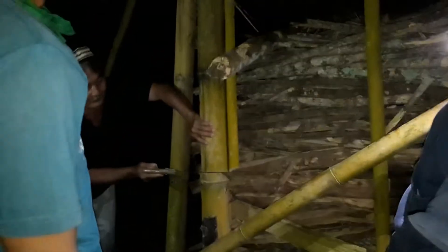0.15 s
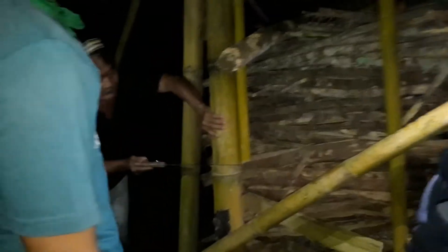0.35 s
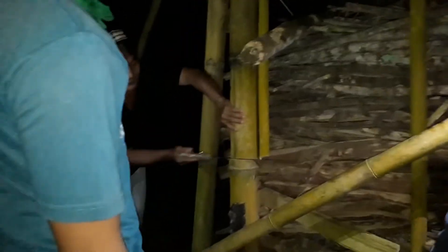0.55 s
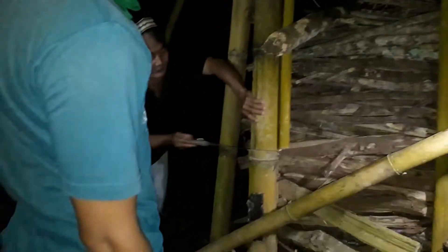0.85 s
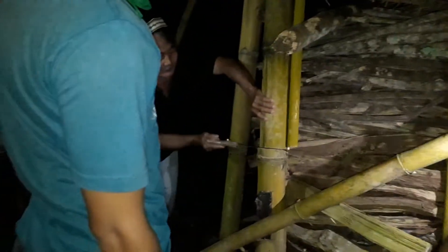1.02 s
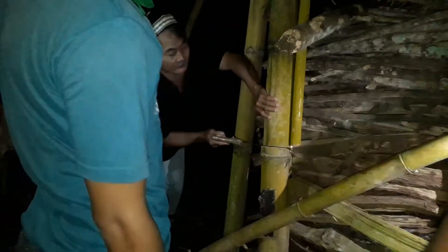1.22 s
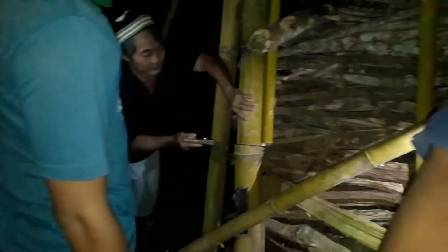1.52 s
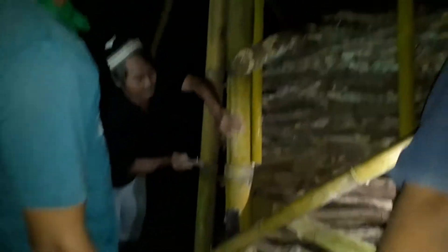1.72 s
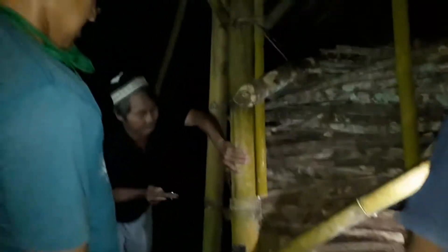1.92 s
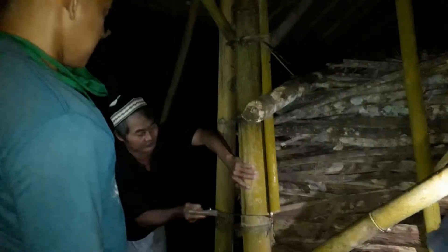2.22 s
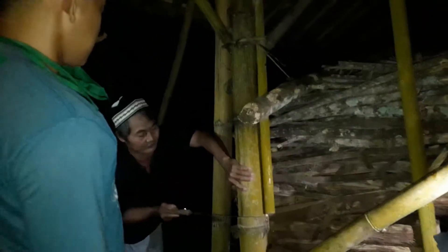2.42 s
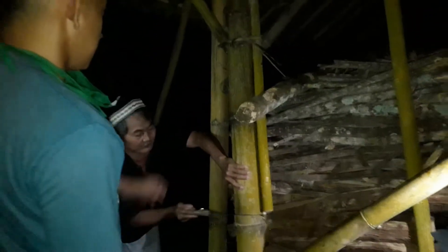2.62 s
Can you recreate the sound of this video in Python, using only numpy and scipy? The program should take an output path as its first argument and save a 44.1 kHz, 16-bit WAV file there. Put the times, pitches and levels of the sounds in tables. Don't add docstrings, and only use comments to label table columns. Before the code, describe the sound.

Close, dry sawing of hollow bamboo outdoors: fast raspy strokes with fibre cracks and brief blade squeals, a short lull, then rougher strokes, over faint cricket trills and low night hum, captured by a phone.

```python
import sys
import numpy as np
from scipy import signal
from scipy.fft import rfft, irfft, next_fast_len
from scipy.io import wavfile
from scipy.ndimage import uniform_filter1d, map_coordinates

SR = 44100
rng = np.random.default_rng(int(sys.argv[2]) if len(sys.argv) > 2 else 0)


def inscribe(sig):
    pcm = np.round(np.clip(np.atleast_2d(sig).T, -1, 1) * 32767)
    wavfile.write(sys.argv[1], SR, pcm.astype(np.int16))


def to_linear_factor(level_db):
    exponent = np.asarray(level_db, float) / 20
    return 10 ** exponent


N = 121275

# (start t/s, fastest t/s, end t/s, level/dB, blade ring level/dB)
STROKES = [(0.0, 0.164, 0.21, -39, -3.5), (0.182, 0.314, 0.42, -35, 2), (0.398, 0.518, 0.64, -31.5, 0.5),
           (0.606, 0.71, 0.84, -33.5, 4), (0.82, 0.933, 1.04, -35, 5.5), (1.293, 1.415, 1.44, -46, -5.5),
           (1.459, 1.504, 1.588, -41, -16), (1.805, 1.869, 1.96, -35, 0), (1.9, 2.005, 2.114, -49, -5),
           (2.117, 2.198, 2.26, -32, 4), (2.25, 2.341, 2.457, -34.5, 9.5), (2.435, 2.584, 2.6565, -31, 2),
           (2.65, 2.653, 2.71, -42.5, -27)]
# (hiss level/dB, frame shake level/dB, hiss lag t/s)
TEARING = [(-1.5, -2.5, -0.0036), (-1.5, 2, 0.0015), (-2, 2, 0.015), (1, 2.5, 0.031), (2.5, 1, -0.0072),
           (-6.5, 7.5, -0.014), (-5.5, 3.5, -0.00085), (4, -5.5, -0.012), (-4.5, -10, 0.026),
           (-2.5, -5, -0.0093), (2.5, 2.5, -.01), (-3.5, -2, -0.0024), (-5, 6.5, -0.0042)]
# (f/Hz, width f/Hz, level/dB)
TUBE_MODES = [
    [(777, 160, 2), (945, 185, 1), (1580, 158, -8), (345, 135, -11)],
    [(744, 136, 2.5), (1743, 83, 0.5), (330, 36, -12.5)],
]
# (f/Hz, width f/Hz, level/dB)
BLADE_MODES = [
    [(1860, 203, -5.5), (2103, 33, 2), (2336, 144, 0.5), (2680, 77, -1), (2774, 36, 5), (3366, 130, 0.5), (3950, 470, -7.5)],
    [(2134, 160, -3), (2363, 73, -4.5), (2567, 70, -3.5), (2834, 53, -1.5), (3170, 88, -9), (3400, 121, -28), (3690, 92, -4.5)],
]
# (f/Hz, level/dB per Hz)
GRIT_COLOUR = [(800, -33), (1300, -11.5), (2400, 2), (4200, -14.5), (7000, -23)]
# (f/Hz, level/dB per Hz)
HISS_COLOUR = [(2350, -16), (4000, -11), (5160, 0.5), (5500, -2), (9010, -5.5), (10900, -14.5),
               (15000, -10.5), (16000, -15)]
# (f/Hz, level/dB per Hz)
THUMP_COLOUR = [(20, -33), (60, -26), (120, -12), (180, -5), (330, -8.5), (470, 1.5), (600, -12.5),
                (900, -27)]
# (t/s, peak level/dB, tube knock level/dB, t60 t/s, attack t/s)
CATCHES = [(0.213, -22.5, -9, 0.058, 0.00024), (.2635, -19, -28, 0.051, 0.0006),
           (.418, -27.5, -5, 0.056, 0.00037), (.6242, -23.5, -20, 0.086, 0.00092),
           (.6565, -21.5, -5, 0.088, 0.00046), (.75, -14, -6, 0.15, 0.0057),
           (.9645, -11, -8.5, 0.041, 0.0007), (1.0367, -23, -3, 0.069, 0.00053),
           (1.0808, -28.5, -7, 0.045, 0.00046), (1.1244, -28, -1.5, 0.079, 0.0014),
           (1.4272, -29, 1, 0.081, 0.00039), (1.4905, -27, 0, 0.077, 0.0012),
           (1.737, -33, 0.5, 0.1, 0.0023), (1.804, -22, -20, 0.22, 0.0067),
           (1.912, -25, 0.5, 0.067, 0.0034), (1.958, -34, -23, 0.081, 0.0023),
           (2.152, -30, 1, 0.11, 0.0016), (2.1, -25.5, -21, 0.39, 0.025),
           (2.264, -21.5, -14, 0.085, 0.00032), (2.3072, -10.5, -9.5, 0.045, 0.00045),
           (2.487, -23.5, 5, 0.064, 0.00049), (2.6583, -23.5, -14, 0.04, 0.00042),
           (2.6684, -24.5, -5.5, 0.064, 0.00083)]
CATCH_SHINE = [-6, 1.5, -14, 7, -1.5, -14, -8, 3.5, -7, -19, 6.5, -15, 0, 0, 3, -6, 3, 0, -1, 2, -2, -12,
               -4]
# (t/s, peak level/dB, brightness level/dB)
SNAGS = [(.121, -35, 0), (.128, -22, -9), (.2424, -21, 3), (.2923, -29, 4), (0.382, -29, 5), (.436, -36, 5),
         (.45, -29, -2), (.4724, -22.5, 2), (0.6807, -24, -10), (.854, -33, -11), (0.8738, -39, 4),
         (.8939, -19, -9), (.927, -18.5, 2.5), (1.383, -36, -3), (1.528, -35, -17), (1.8313, -23.5, 0),
         (1.843, -33, -8), (1.865, -15.5, -14), (1.881, -10.5, -24), (1.9713, -39.5, 10),
         (2.0218, -30.5, -9), (2.1185, -28.5, -5), (2.205, -20.5, 1), (2.5232, -22, 1), (2.5481, -14, -1),
         (2.5975, -17, -2)]
# (f/Hz, level/dB)
CRACK_COLOUR = [(300, -1), (1500, 0), (3500, 1.5), (8000, -8.5), (12000, -6), (16500, -4.5)]
# (t/s, peak level/dB)
BITES = [(.133, -29), (.327, -23), (.713, -16), (.718, -18), (1.882, -17), (2.165, -17), (2.170, -19),
         (2.176, -19), (2.21, -22), (2.306, -15), (2.321, -18), (2.335, -16), (2.342, -15), (2.356, -14),
         (2.371, -14), (2.377, -20), (2.546, -20), (2.553, -19)]
# (t/s, half length t/s, level/dB, pitch f/Hz)
SINGING = [(.275, 0.014, -32, 2600), (.333, 0.0069, -27, 2650), (0.526, 0.028, -37, 2340),
           (.545, .012, -35, 830), (.66, 0.0045, -31, 825), (0.693, .008, -34, 1920),
           (.71, 0.017, -26, 2620), (.97, 0.012, -33.5, 1580), (1.41, 0.021, -44.5, 838),
           (1.496, 0.0018, -36, 5710), (1.132, 0.0051, -38, 858), (1.828, 0.0078, -36, 774),
           (1.877, 0.01, -33, 3400), (2.164, 0.011, -35, 3760), (2.183, 0.0072, -29, 2653),
           (2.234, 0.0092, -34.5, 773), (2.292, 0.0028, -26.5, 730), (2.321, 0.026, -33, 3737),
           (2.355, .008, -26.5, 1660), (2.502, 0.016, -32, 763), (2.548, 0.011, -28, 2598),
           (2.579, 0.013, -25.5, 753)]
# (t/s, level/dB, pitch f/Hz, t60 t/s)
JOLTS = [(0.171, -47, 397, 0.16), (0.335, -28, 330, 0.12), (0.619, -43.5, 180, .1),
         (0.967, -41, 183.3, 0.33), (1.031, -42.5, 190, 0.19), (1.125, -50, 133.4, 0.24),
         (1.745, -30.5, 348, 0.027), (2.349, -28.5, 320, .15), (2.358, -42, 196, 0.1),
         (2.551, -39.5, 140, 0.37)]
# (f/Hz, width f/Hz, click rate f/Hz, level/dB)
CRICKETS = [
    (3520, 310, 110, -61.5),
    (3930, 340, 160, -65.5),
    (5600, 590, 150, -74),
    (7000, 260, 72, -72.5),
    (4600, 700, 110, -69.5),
]
# (f/Hz, level/dB per Hz)
NIGHT_COLOUR = [(15, -33), (40, -25), (100, -7.5), (170, -4), (650, -12.5), (2500, -19), (5500, -22),
                (6100, -28), (16000, -31.5)]
# (t/s, above f/Hz)
DUCKED_HIGHS = [(.623, 9000), (1.035, 11000), (1.734, 7000), (1.803, 4300), (2.262, 6500), (2.658, 7000)]
OPEN_ATTACKS = [.628, 1.04, 1.431]


def unit(x):
    return x / np.sqrt(np.mean(x ** 2) + 1e-20)


def wobble(rate):
    knots = rng.standard_normal(int(N * rate / SR) + 4)
    return map_coordinates(knots, [np.arange(N) * rate / SR])


def filtered(x, response):
    m = next_fast_len(N + SR // 2)
    return irfft(rfft(x, m) * response(np.fft.rfftfreq(m, 1 / SR)), m)[..., :N]


def colour(points):
    f, db = np.transpose(points)
    return lambda hz: to_linear_factor(np.interp(np.log(hz + 1), np.log(f + 1), db))


def body(peaks):
    def response(f):
        total = 0
        for k, (centre, width, db) in enumerate(peaks):
            damping = 1j * f * width
            total = total + (-1) ** k * to_linear_factor(db) * damping / (centre ** 2 - f ** 2 + damping)
        return total
    return response


def through(x, pair):
    deep = np.arange(N) > 1.97 * SR
    shallow_ring = filtered(x * ~deep, body(pair[0]))
    return shallow_ring + filtered(x * deep, body(pair[1]))


def patchy(x):
    z = signal.stft(x, nperseg=256)[2]
    field = uniform_filter1d(rng.standard_normal(z.shape), size=5, axis=0)
    field = uniform_filter1d(field, size=3, axis=1)
    return unit(signal.istft(z * to_linear_factor(4.5 * unit(field)), nperseg=256)[1][:N])


def effort(power, extra_db=0, lag=0):
    rise, fall = 1.39, 2.13
    t, gain = np.arange(N) / SR, np.zeros(N)
    each = np.zeros(len(STROKES))
    for (start, top, end, db, _), more, late in zip(STROKES, extra_db + each, lag + each):
        top = np.clip(top + late, start + 0.0033, end - .003)
        speed = np.sin(np.pi / 2 * np.interp(t, [start, top, end], [0, 1, 0]))
        gain += to_linear_factor(db + more) * speed ** (power * np.where(t < top, rise, fall))
    return gain


def teeth():
    teeth_per_s, scatter_db, surge_db, surges_per_s = 1100, 1, 0.92, 130
    hit = rng.random(N) < teeth_per_s / SR
    size = to_linear_factor(scatter_db * np.clip(rng.standard_normal(N), -3, 1))
    sign = np.sign(rng.standard_normal(N))
    shower = unit(unit(hit * size * sign) + 0.96 * rng.standard_normal(N))
    return shower * to_linear_factor(surge_db * wobble(surges_per_s))


def hollow_tube(strikes):
    notch = body([(590, 150, 0)])
    ring = through(strikes * effort(1), TUBE_MODES)
    return filtered(ring, lambda f: 1 - 0.32 * notch(f)) / np.std(through(strikes, TUBE_MODES))


def steel_blade(strikes):
    ring_db = np.transpose(STROKES)[-1]
    ring = through(teeth() * effort(1.55, ring_db), BLADE_MODES)
    return ring / np.std(through(strikes, BLADE_MODES))


def tearing(strikes):
    hiss_db, _, lag = np.transpose(TEARING)
    grit_gain = to_linear_factor(-2 + 1.8 * wobble(70)) * effort(1.55, hiss_db, lag / 2)
    grit = grit_gain * patchy(filtered(strikes, colour(GRIT_COLOUR)))
    hiss_gain = to_linear_factor(-5 + 0.55 * wobble(45.35)) * effort(1.6, hiss_db, lag)
    hiss = hiss_gain * patchy(filtered(strikes, colour(HISS_COLOUR)))
    return grit + hiss


def frame_shake():
    shake_db = np.transpose(TEARING)[1]
    return to_linear_factor(-10.5) * effort(0.93, shake_db, 0.021) * unit(filtered(teeth(), colour(THUMP_COLOUR)))


def saw():
    strikes = teeth()
    return hollow_tube(strikes) + steel_blade(strikes) + tearing(strikes) + frame_shake()


def catches():
    snag_knock_db, snag_t60_s, snag_attack_s = -23.5, 0.048, 0.0009
    tick_db, tick_t60_s, shine_hz = -2.5, 0.022, 9200
    tick, tear, knock = np.zeros((3, N))
    t = np.arange(SR // 16) / SR
    events = CATCHES + [(s, db, snag_knock_db, snag_t60_s, snag_attack_s) for s, db, _ in SNAGS]
    brightness = CATCH_SHINE + [snag[2] for snag in SNAGS]

    shine = np.ones(N)
    for s, db in sorted(zip([event[0] for event in events], brightness)):
        shine[round(s * SR) - 40:] = to_linear_factor(db)

    for s, db, knock_db, t60, attack in events:
        tear_noise, knock_noise, tick_noise = rng.standard_normal((3, len(t)))
        here = slice(round(s * SR), round(s * SR) + len(t))
        fade = to_linear_factor(db - 60 * t / t60) * (1 - np.exp(-t / attack))
        sharpness = np.exp(-attack / 0.00073)
        tick[here] += to_linear_factor(db + tick_db - 60 * t / tick_t60_s) * tick_noise * sharpness
        tear[here] += fade * tear_noise
        knock[here] += to_linear_factor(knock_db + 8.0) * fade * knock_noise

    bright_tick = filtered(tick, lambda hz: 1j * hz / (5000 + 1j * hz))
    burst = bright_tick + to_linear_factor(-4.0) * filtered(tear, colour(CRACK_COLOUR))
    high = filtered(burst, lambda hz: 1 / (1 + (shine_hz / (hz + 1)) ** 6))
    return burst + (shine - 1) * high + through(knock, TUBE_MODES)


def squeals():
    out, t = np.zeros(N), np.arange(N) / SR
    for s, db in BITES:
        low_phase, high_phase, detune = 2 * np.pi * rng.random(3)
        hz = 2615 * (1 + .02 * np.sin(detune))
        tone = np.sin(2 * np.pi * hz * t + low_phase)
        tone += 0.19 * np.sin(2 * np.pi * 1.4 * hz * t + high_phase)
        out += to_linear_factor(db) * np.exp(-.5 * ((t - s) / 0.0012) ** 2) * tone
    return out


def singing():
    out, u = np.zeros(N), np.arange(-SR // 16, SR // 16) / SR
    for s, half, db, hz in SINGING:
        roughness = .065 * np.cumsum(rng.standard_normal(len(u)))
        tone = np.sin(2 * np.pi * hz * u + roughness)
        out[round(s * SR) - SR // 16:][:len(u)] += to_linear_factor(db) * np.exp(-.5 * (u / half) ** 2) * tone
    return out * to_linear_factor(4 * wobble(150))


def frame_jolts():
    out, t = np.zeros(N), np.arange(SR // 6) / SR
    onset = 1 - np.exp(-(t / 0.0052) ** 2)
    for s, db, hz, t60 in JOLTS:
        phase = 2 * np.pi * hz * t + 0.034 * np.cumsum(rng.standard_normal(len(t)))
        out[round(s * SR):][:len(t)] += to_linear_factor(db - 60 * t / t60) * onset * np.sin(phase)
    return out


def yard(x):
    t60_s, level_db, low_hz = 0.29, -12.5, 606
    t, out = np.arange(SR // 3) / SR, np.zeros(N)
    part = np.arange(N) // (SR // 5) % 4
    for k in range(4):
        tail = rng.standard_normal(len(t)) * to_linear_factor(-60 * t / t60_s)
        out += signal.fftconvolve(x * (part == k), tail / np.linalg.norm(tail))[:N]
    return to_linear_factor(level_db) * filtered(out, lambda hz: hz / (hz + low_hz))


def crickets():
    out = np.zeros(N)
    for hz, width, rate, db in CRICKETS:
        cycles = np.cumsum(rate * (1 + .01 * wobble(10))) / SR
        clicks = np.diff(np.floor(cycles), prepend=0)
        drive = unit(clicks * to_linear_factor(0.62 * wobble(53))) + 1.4 * rng.standard_normal(N)
        wing = body([(hz, width, 0)])
        trill = unit(filtered(drive, lambda f: wing(f) ** 2))
        out += to_linear_factor(db + 0.62 * wobble(8.4)) * trill
    return out


def night_hum():
    hum = unit(filtered(rng.standard_normal(N), colour(NIGHT_COLOUR)))
    return to_linear_factor(-58 + 0.23 * wobble(32)) * hum


def scene():
    low_cut_hz = 90
    work = saw() + catches() + squeals() + singing()
    work = filtered(work, lambda hz: (1j * hz / (low_cut_hz + 1j * hz)) ** 2)
    return (work + yard(work) + frame_jolts() + crickets() + night_hum())[None]


def holes(x):
    above_hz, threshold, depth_db = 10370, 0.66, -28
    hz, s, z = signal.stft(x, SR, nperseg=512)
    field = uniform_filter1d(rng.standard_normal(z.shape[1:]), size=7, axis=0)
    field = unit(uniform_filter1d(field, size=2, axis=1))
    field = field + np.interp(s, [1.6, 1.9], [-.4, .3])
    thin = (hz[:, None] > above_hz) / (1 + np.exp(-4 * (field - threshold)))
    return signal.istft(z * to_linear_factor(depth_db * thin), SR, nperseg=512)[1][:, :N]


def top_cut(x):
    return signal.sosfilt(signal.butter(12, 16970, fs=SR, output="sos"), x)


def record(dry):
    top_hz, offset = 15860, -0.00052
    t = np.arange(N) / SR
    for s, low_hz in DUCKED_HIGHS:
        dip = np.interp(t - s, [-.016, -.011, -.001, 0], [0, 1, 1, 0])
        dry = dry - dip * filtered(dry, lambda hz: 1 / (1 + (low_hz / (hz + 1)) ** 16))
    narrow = filtered(holes(dry), lambda hz: 1 / (1 + (hz / top_hz) ** 200))
    wide = sum(np.exp(-.5 * ((t - s) / .003) ** 2) for s in OPEN_ATTACKS)
    top = filtered(dry * wide, lambda hz: (hz > top_hz) * (hz < 16800))
    mix = offset + narrow + to_linear_factor(-13) * top
    return top_cut(mix)


dry = scene()
out = record(dry)
inscribe(out)
```